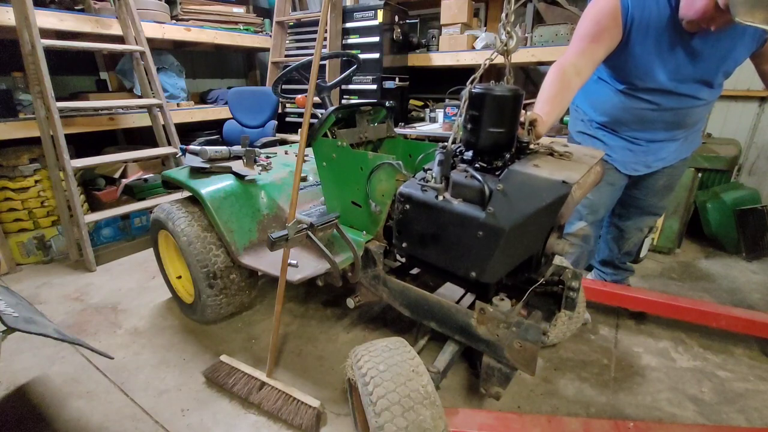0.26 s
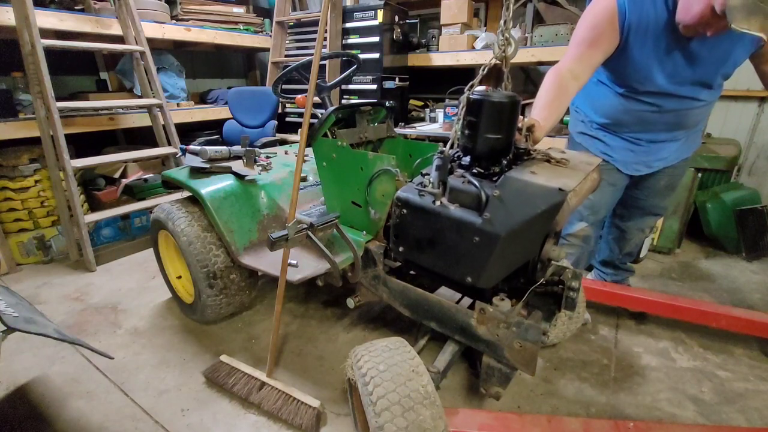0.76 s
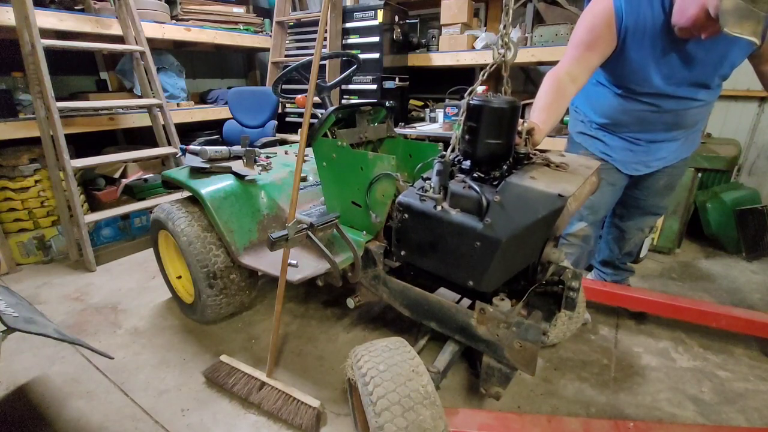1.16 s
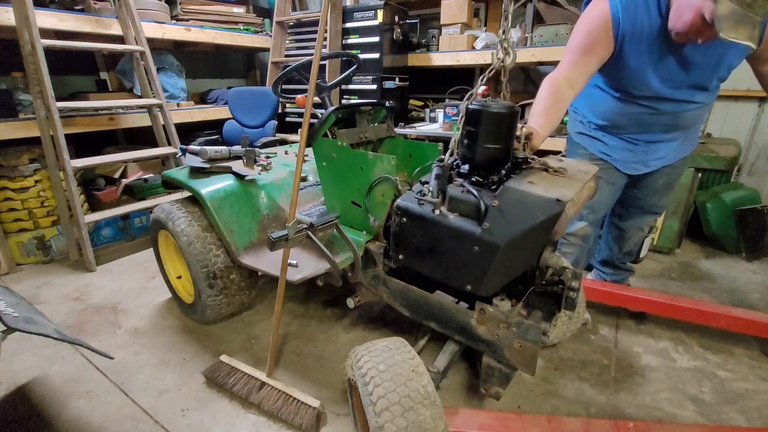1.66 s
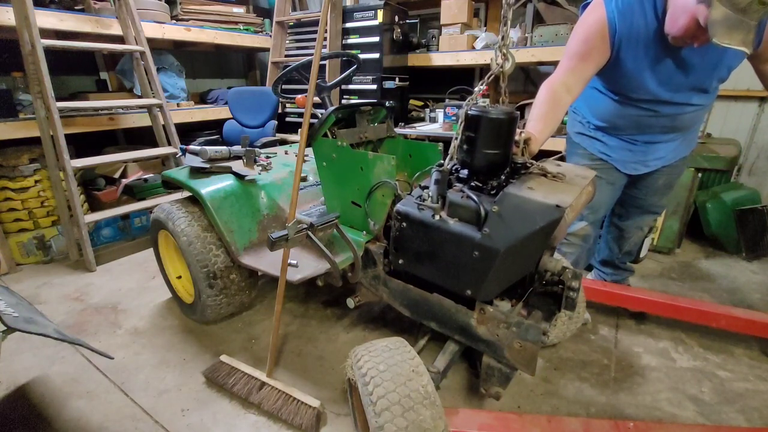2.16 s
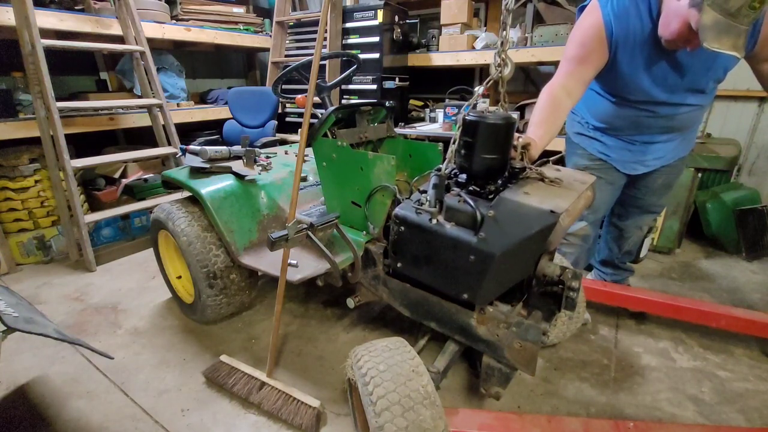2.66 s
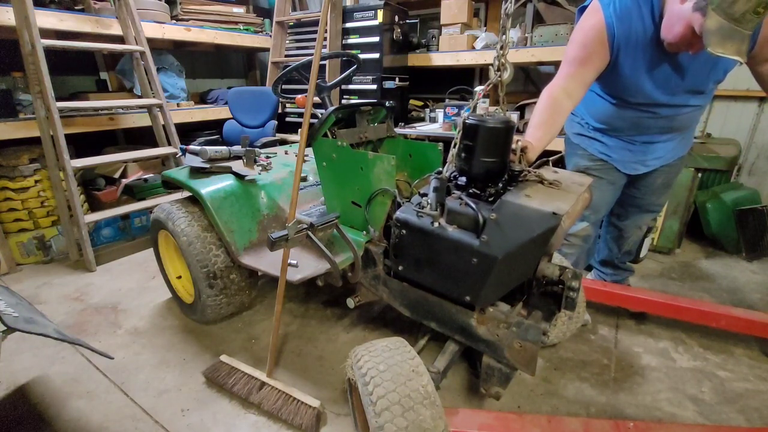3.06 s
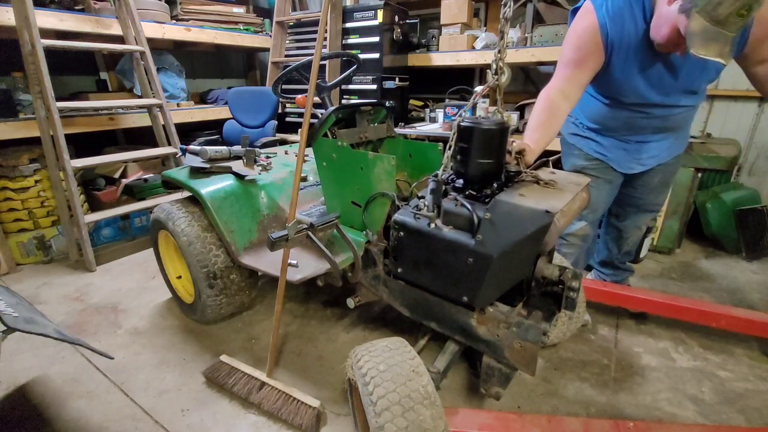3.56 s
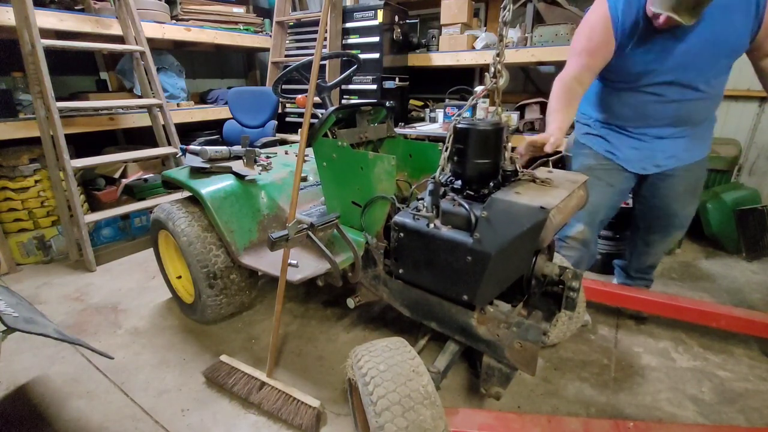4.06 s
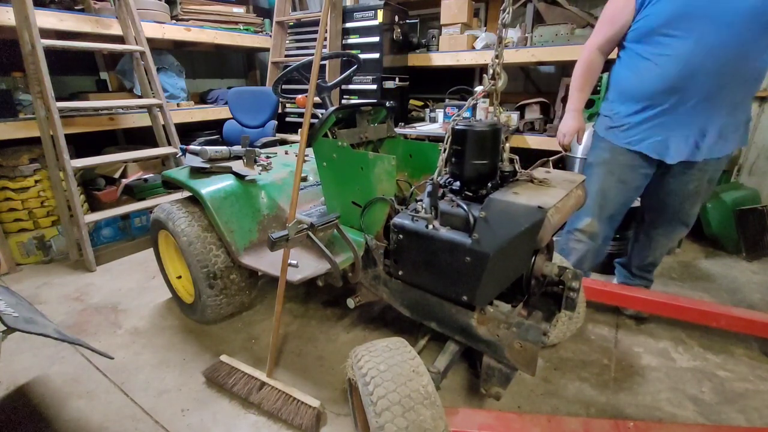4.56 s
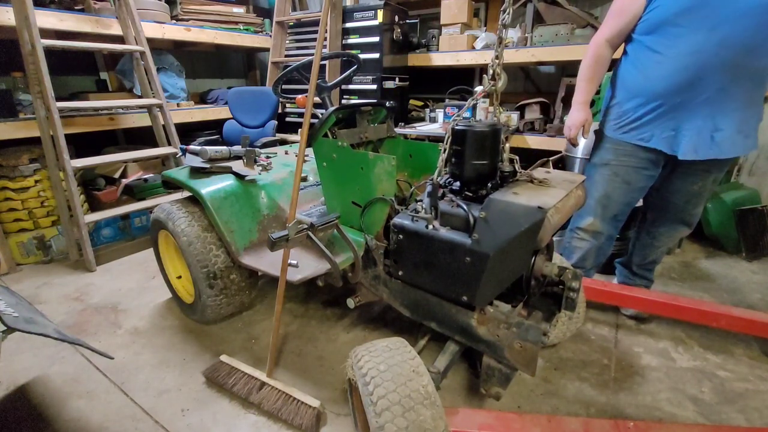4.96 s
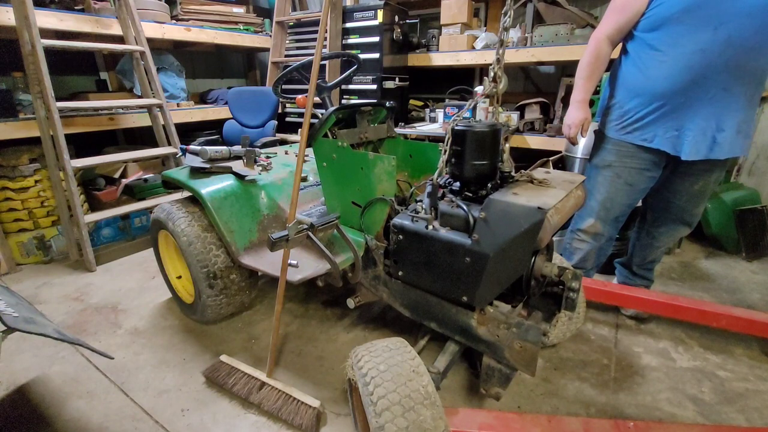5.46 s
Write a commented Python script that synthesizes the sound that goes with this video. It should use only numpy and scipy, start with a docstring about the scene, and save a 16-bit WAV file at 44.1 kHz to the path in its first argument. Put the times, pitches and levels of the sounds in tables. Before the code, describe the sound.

Metal links tick and clank sharply, a duller knock follows, then a heavy steel bump rings in a cluttered workshop before small clicks fade.

```python
"""An engine hanging from a hoist chain is rocked by hand over a tractor frame in a workshop.
The chain slips and snaps taut with a bright clank; later the engine's base bumps the frame heavily.
Blows are short-lived noise plus damped sines, with lighter knocks and link clicks between them.
A diffuse noise tail is the room; dull scuffs, faint wavering tones and a low rumble are shaped noise
and swelling sines."""
import sys
import numpy as np
from scipy import signal
from scipy.fft import rfft, irfft
from scipy.io import wavfile
from scipy.ndimage import uniform_filter1d

SR = 44100
rng = np.random.default_rng(int(sys.argv[2]) if len(sys.argv) > 2 else 0)


def wav_record(signal):
    """Record a signal, one row per channel, as 16-bit PCM in the file named by sys.argv[1]."""
    frames = np.transpose(np.atleast_2d(signal))
    bounded = np.clip(frames, -1, 1)
    # unit amplitude maps onto the largest positive 16-bit level
    quanta = np.round(bounded * 32767).astype(np.int16)
    wavfile.write(sys.argv[1], SR, quanta)


N = 251370

# Left-right likeness of close sound. Each row: frequency in Hz, likeness [-1..1].
NEAR_ALIKE = [(100, 1), (500, .9), (1200, 0.41), (3000, 0.45), (12000, 0.26)]
# Left-right likeness of diffuse sound. Each row: frequency in Hz, likeness [-1..1].
FAR_ALIKE = [(60, 0.824), (150, .93), (300, 0.094), (640, 0), (1400, 0.164), (15000, 0.044)]
CLICK_SEND_DB = -8  # room send of link clicks and creep ticks


def amp(db):
    """Decibels to amplitude factor."""
    return 10 ** (np.asarray(db) / 20)


def evened(x):
    """Scales to unit RMS."""
    return x / np.sqrt(np.mean(x ** 2) + 1e-20)


def read(points, hz):
    """Interpolates (Hz, value) points on a log-frequency axis."""
    point_hz, value = np.transpose(points)
    return np.interp(np.log(hz + 1), np.log(point_hz + 1), value)


def add(mix, start_s, sound):
    """Adds a sound at its start time, cut at the end of the mix."""
    part = mix[:, round(start_s * SR):][:, :sound.shape[1]]
    part += sound[:, :part.shape[1]]


def noise(spectrum, alike, size):
    """Coloured noise of unit RMS at two microphones, partly alike."""
    hz = np.fft.rfftfreq(size, 1 / SR)
    mid, side = rfft(rng.standard_normal((2, size)))
    same = np.clip(read(alike, hz), -1, 1)
    mid = mid * np.sqrt(1 + same)
    side = side * np.sqrt(1 - same)
    pair = np.array([mid + side, mid - side])
    return evened(irfft(pair * amp(read(spectrum, hz)), size))


def die_away(x, t60_s):
    """Lets each frequency decay at its own speed."""
    hz, t, z = signal.stft(x, SR, nperseg=256)
    fade = amp(-60 * t / read(t60_s, hz)[:, None])
    return signal.istft(z * fade, SR, nperseg=256)[1][:, :x.shape[1]]


def ring(hz, db, t60_s, size):
    """Damped sines starting with the blow; left-right likeness sets their phase gap at the microphones."""
    t = np.arange(size) / SR
    sign = (-1) ** np.arange(len(hz))  # neighbouring modes swing opposite ways
    likeness = np.clip(read(NEAR_ALIKE, hz), -1, 1)
    half_gap = rng.choice([-1, 1], len(hz)) * np.arccos(likeness) / 2
    angle = (2 * np.pi * hz[:, None] * t).astype(np.float32)
    decay = np.exp((-np.log(1000) * t / t60_s[:, None]).astype(np.float32))
    fade = (sign * amp(db))[:, None] * decay
    mid = np.cos(half_gap) @ (fade * np.sin(angle))
    side = np.sin(half_gap) @ (fade * np.cos(angle))
    return np.array([mid + side, mid - side])


def clanks(wet_db=-4, left_lag_samples=4):
    """Every blow and creep tick, heard directly (later at the left) and through the room."""
    direct, sent = np.zeros((2, 2, N))
    links = chain_ring(size=18000)
    for start_s, send_db, contact in contacts():
        sound = blow(links, **contact)
        add(direct, start_s, sound)
        add(sent, start_s, amp(send_db) * sound)
    creep_start_s = 0.395
    slips = creep(links, creep_start_s)
    add(direct, creep_start_s, slips)
    add(sent, creep_start_s, amp(CLICK_SEND_DB) * slips)
    direct[0] = np.roll(direct[0], left_lag_samples)
    return direct + amp(wet_db) * workshop(sent)


def contacts():
    """Yields start, room send and strike of each contact; harder blows ring more, weightier ones chatter longer."""
    # Hard steel-on-steel hits and rebounds. Each row: start in seconds, body (250-1300 Hz) level in dB,
    # thump, clash and sparkle in dB re body, place (0 chain .. 1 base),
    # pitch of the struck part in Hz, its knock in dB re body before the blow's part trim.
    hard_hits = [ (0.594, -41, -20, -0.5, -1.5, 0.33, 360, 5), (0.6132, -24.5, -16, -1, 4.5, 0, 1350, -13),
                 (0.6197, -37, -12, 6, 10.5, 0.12, 400, -2),
                 (0.7131, -39.5, -11, 1.5, -9, 0.03, 1400, -0.5), (1.4449, -41.5, -14, -5, -36, .8, 480, 3),
                 (1.467, -49, -2, -7, -30, .9, 440, 3), (2.648, -20, -12, -11.5, -24.5, 1, 1106, -3),
                 (2.660, -29.5, -1, -4.5, -10.5, 0.88, 455, 7.5), (2.678, -35, -4, 3, -4.5, 0.58, 140, 0),
                 (2.698, -36.5, -9, 2, -6, 0.68, 255, 5), (3.046, -40, -11.5, -8, -16.5, 0.6, 446, 2),
                 (3.8745, -41.5, -13, -8, -22, 0.64, 812, 1), (3.911, -52.5, -4.5, -8, -14, .7, 319, 2.5),
                 (3.9824, -49.5, -8, -2.5, -19.5, 0.48, 1700, 5.5)]
    # Dull nudges as the load shifts. Each row: start in seconds, body level in dB, struck part's pitch in Hz.
    load_nudges = [(0.426, -44.5, 1300), (0.494, -53, 350), (0.537, -42.5, 423), (3.221, -58, 892),
                   (3.245, -55, 145), (5.642, -66, 700)]
    # Light clicks of single links. Each row: start in seconds, body level in dB, link pitch in Hz,
    # its knock in dB re body before the blow's part trim.
    link_clicks = [(0.398, -62, 1520, -15), (0.885, -60, 1129, -5), (2.891, -72, 11400, 0),
                   (2.994, -62, 5600, 4), (3.154, -67, 1000, -10), (3.289, -58, 1223, 6),
                   (3.461, -70, 3600, 4), (4.281, -79, 7173, 1), (5.408, -80, 305, 2), (5.536, -79, 438, 1)]
    chain_send_db, base_send_db = -8, -11.5  # the chain hangs in the open, the frame screens the base
    full_blow_db, full_ring_db, ring_db_per_db = -22, -1, 0.5
    chatter_s_at_0_db, chatter_growth = 0.006, 0.8  # dB of chatter time per dB of thump
    nudge_send_db = -1
    nudge = dict(thump_db=-8, clash_db=-16, sparkle_db=-27, chatter_s=0.004, place=0.3, ring_db=-4, knock_db=-4)
    click = dict(thump_db=-7, clash_db=0.5, sparkle_db=-13, chatter_s=0.0025, place=0.35, ring_db=-1)

    for start_s, body_db, thump_db, clash_db, sparkle_db, place, knock_hz, knock_db in hard_hits:
        send_db = chain_send_db + place * (base_send_db - chain_send_db)
        chatter_s = chatter_s_at_0_db * amp(chatter_growth * thump_db)
        ring_db = full_ring_db + ring_db_per_db * (body_db - full_blow_db)
        yield start_s, send_db, dict(
            body_db=body_db, thump_db=thump_db, clash_db=clash_db, sparkle_db=sparkle_db,
            chatter_s=chatter_s, place=place, ring_db=ring_db, knock_hz=knock_hz, knock_db=knock_db)
    for start_s, body_db, knock_hz in load_nudges:
        yield start_s, nudge_send_db, dict(nudge, body_db=body_db, knock_hz=knock_hz)
    for start_s, body_db, knock_hz, knock_db in link_clicks:
        yield start_s, CLICK_SEND_DB, dict(click, body_db=body_db, knock_hz=knock_hz, knock_db=knock_db)


def blow(links, body_db, thump_db, clash_db, sparkle_db, chatter_s, place, ring_db, knock_hz, knock_db,
         engine_db=-9, links_db=-19, links_at_base_db=-20, part_db=-3, size=50000):
    """Steel meets steel: a crowd of short modes builds while the parts chatter, a few strong modes sing on."""
    # Modes of the engine and its sheet-metal covers, one column a mode. Rows: frequency in Hz,
    # relative level in dB when pulled at the chain, same when struck at the base, T60 in seconds.
    engine_modes = [ (78, 139, 203, 253, 285.5, 333, 415, 443, 452.5, 508, 538, 705, 885, 897, 1108, 1120, 1164, 1256, 1488, 2010),
                    (-28.5, -18, -36.5, -6.5, -16.5, 1, -5.5, -3.5, -15.5, -18.5, -13.5, -22.5, -14.5, -20.5, -38, -5, -16, -13.5, -10.5, -19.5),
                    (-3.5, 0, -9.5, -17, 0, -13.5, -0.5, -18, 1.5, -1.5, -10.5, -4, -21, -10.5, -29, 0, -10.5, -24, -24.5, -7),
                    (0.0944, 0.4131, 0.7552, 0.64, 0.5774, .6, 0.4187, .5, 0.3559, 0.3249, 0.7, 0.397, .5, .4, 3.5, 0.5861, .5, 0.2, .5, 0.2034)]
    # Spectrum of the short-lived modes. Each row: frequency in Hz,
    # relative density in dB per Hz at the chain, same at the base.
    crowd_spectrum = [(39.967, -28.5, -26.5), (86.4, -14, -5.5), (189, -14, -9), (400, 0.5, 5),
                      (502, -7, 5.5), (610, -11.5, -9), (694.4, -13, 3.5), (1065, -10, -5.5),
                      (1555, -2.5, -16), (2106, -17, -14.5), (3300, -14, -20), (7670, -16, -30),
                      (8340, -28, -40.5), (11800, -19.5, -37.5)]
    # Decay of the short-lived modes. Each row: frequency in Hz, T60 in seconds.
    crowd_t60_s = [(60, 0.28), (400, 0.14), (1200, 0.16), (4000, 0.19), (14000, 0.15)]
    t = np.arange(size) / SR
    place = np.clip(place, 0, 1)

    hz, chain_db, base_db, t60_s = np.array(engine_modes)
    mode_db = (1 - place) * chain_db + place * base_db
    sound = amp(ring_db + engine_db) * ring(hz, mode_db, t60_s, size)
    # a blow at the base hardly shakes the chain
    add(sound, 0, amp(ring_db + links_db + links_at_base_db * place) * links)
    spectrum = [(f, (1 - place) * chain + place * base) for f, chain, base in crowd_spectrum]
    add(sound, 0, die_away(noise(spectrum, NEAR_ALIKE, size=16384), crowd_t60_s))

    build = np.minimum(t / max(chatter_s, 1 / SR), 1)
    sound = weigh(build * sound, body_db + np.array([thump_db, 0, clash_db, sparkle_db]))
    part = amp(body_db + knock_db + part_db) * knock(knock_hz, size=8000)
    add(sound, 0, part * build[:part.shape[1]])
    return sound


def weigh(x, band_db, size=900):
    """Contact hardness sets how strongly each band is driven: RMS over the first `size` samples."""
    # Band edges between thump, body, clash and sparkle. Each entry: frequency in Hz.
    edges_hz = [250, 1300, 8000]
    out = 0
    for edge_hz, db in zip([*edges_hz, None], band_db):
        band = x
        if edge_hz:
            band = signal.sosfilt(signal.butter(3, edge_hz, fs=SR, output="sos"), x)
            x = signal.sosfilt(signal.butter(3, edge_hz, "high", fs=SR, output="sos"), x)
        out = out + band * amp(db) / np.sqrt(np.mean(band[:, :size] ** 2))
    return out


def knock(hz, size, t60_s=0.097, width=1.3):
    """The struck part answers with a tight cluster of quickly damped modes, as decaying narrow noise."""
    cluster = [(hz / width ** 2, -70), (hz / width, -20), (hz, 0), (hz * width, -20), (hz * width ** 2, -70)]
    decay = np.exp(-np.log(1000) * np.arange(size) / SR / t60_s)
    sound = noise(cluster, NEAR_ALIKE, size) * decay
    return sound / np.sqrt(np.mean(sound[:, :SR // 50] ** 2))  # unit RMS over the first 20 ms


def chain_ring(size, crowd_db=-15, crowd_t60_s=0.23, count=160):
    """Each link has slightly different modes: a few stand out of a dense shimmer."""
    # Modes of the links and hook, one column a mode. Rows: frequency in Hz, relative level in dB,
    # T60 in seconds.
    link_modes = [ (3224, 3780, 4522, 5310, 6991, 7494, 9480, 11410, 12165, 12320, 13078, 14068, 15080),
                  (-2.5, -9, -5, 0, 4, -9, -10, -14, 1, 0.5, -3.5, -4, -6.5),
                  (0.2453, 0.42, 0.01, 0.3628, .24, 0.06, 0.0158, 0.2661, .22, 0.1472, 0.1944, 0.1453, .16)]
    hz = rng.uniform(2000, 15500, count)
    db = crowd_db + 3 * rng.standard_normal(count)
    strong = ring(*np.array(link_modes), size)
    shimmer = ring(hz, db, crowd_t60_s * rng.uniform(.6, 1.4, count), size)
    return strong + shimmer


def creep(links, start_s, end_s=0.6):
    """Links creep over the hook ever harder before the chain snaps taut: random tiny slips, each a faint tick."""
    slips_per_s, growth_db_per_s, spread_db = 200, 20, 4
    tick = blow(links, body_db=-69, thump_db=-10, clash_db=1, sparkle_db=-11, chatter_s=0.001,
                place=0.3, ring_db=-8, knock_hz=3200, knock_db=-4)
    t = np.arange(start_s, end_s, 1 / SR) - end_s
    chance = rng.random(SR)[:len(t)]
    strength = rng.standard_normal(SR)[:len(t)]
    slips = (chance < slips_per_s / SR) * amp(growth_db_per_s * t + spread_db * strength)
    return signal.fftconvolve(slips[None], tick, axes=1)


def workshop(x, swell_s=0.037):
    """Shelves and walls scatter the sound into a tail that swells and dies, the middle range lasting longest."""
    # Tail colour. Each row: frequency in Hz, relative level in dB.
    tail_spectrum = [(60, -7.5), (300, -3), (1500, -2), (6000, -2.5), (9000, -3.5), (15000, -4)]
    # Tail decay. Each row: frequency in Hz, T60 in seconds.
    tail_t60_s = [(60, 0.55), (300, .8), (1200, .88), (3000, .78), (6500, 0.54), (9000, 0.45), (15000, .41)]
    t = np.arange(SR) / SR
    swell = 1 - np.exp(-(t / swell_s) ** 2)
    tail = die_away(noise(tail_spectrum, FAR_ALIKE, SR), tail_t60_s) * swell
    return signal.fftconvolve(x, tail / np.linalg.norm(tail[0]), axes=1)[:, :N]


def scuffing(rise_s=0.12):
    """The engine scuffs on the frame: dull noise swells with each sway and fades as it settles."""
    # Sways. Each row: time of the top in seconds, level there in dB, time to fade by 1/e in seconds.
    sways = [(0.15, -68, 0.4), (0.75, -56.5, 0.2), (2.43, -66, 0.4), (3.25, -59.5, 0.15), (3.72, -61, 0.17),
             (4.33, -65, 0.8), (5.68, -63, 0.3)]
    # Scuff colour. Each row: frequency in Hz, relative density in dB per Hz.
    scuff_spectrum = [(100, -24), (220, -11.5), (295, 1.5), (370, -8), (460, -8), (620, -12), (900, -25.5),
                      (2000, -33), (8000, -40), (16000, -61.5)]
    t = np.arange(N) / SR
    swells = [amp(db) * np.exp(-np.maximum((top_s - t) / rise_s, (t - top_s) / fade_s))
              for top_s, db, fade_s in sways]
    return np.linalg.norm(swells, axis=0) * noise(scuff_spectrum, FAR_ALIKE, N)


def faint_tones():
    """Now and then a soft sine of slightly wavering pitch swells and fades."""
    # Tones. Each row: time of the top in seconds, time from top to 1/e in seconds, mean pitch in Hz,
    # peak level in dB.
    tones = [(0.042, 0.033, 400, -62.5), (0.295, 0.118, 585, -72.5), (1.393, 0.096, 590, -70.5),
             (5.211, 0.0774, 590, -68.5)]
    t = np.arange(N) / SR
    waver = evened(uniform_filter1d(rng.standard_normal(N), size=2000))
    warped_s = np.cumsum(1 + 0.0073 * waver) / SR  # 0.73 % RMS pitch waver
    return sum(amp(db) * np.exp(-((t - top_s) / half_s) ** 2) * np.sin(2 * np.pi * hz * warped_s)
               for top_s, half_s, hz, db in tones)


def rumble(level_db=-66.5):
    """Steady low background noise."""
    # Rumble colour. Each row: frequency in Hz, relative density in dB per Hz.
    rumble_spectrum = [(20, -26.5), (40, -11), (62, 2), (107, -16.5), (142, -13), (193, -19.5),
                       (300, -16.5), (450, -20), (700, -23), (1100, -33.5), (1600, -41.5), (3000, -46),
                       (8000, -48), (15000, -45.5)]
    return amp(level_db) * noise(rumble_spectrum, FAR_ALIKE, N)


def scene(right_db=0.4171):
    """The engine hangs a little to the right, over the background."""
    background = rumble() + faint_tones()
    engine = clanks() + scuffing()
    return engine * amp([[-right_db], [right_db]]) + background


def record(dry, edge_hz=15750):
    """Band limit: a linear-phase lowpass."""
    lowpass = signal.firwin(511, edge_hz, window=("kaiser", 9), fs=SR)
    return signal.oaconvolve(dry, lowpass[None], "same")


dry = scene()
out = record(dry)
wav_record(out)
```